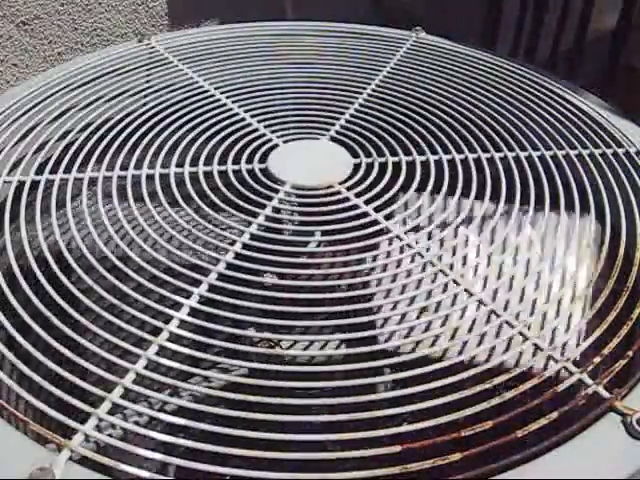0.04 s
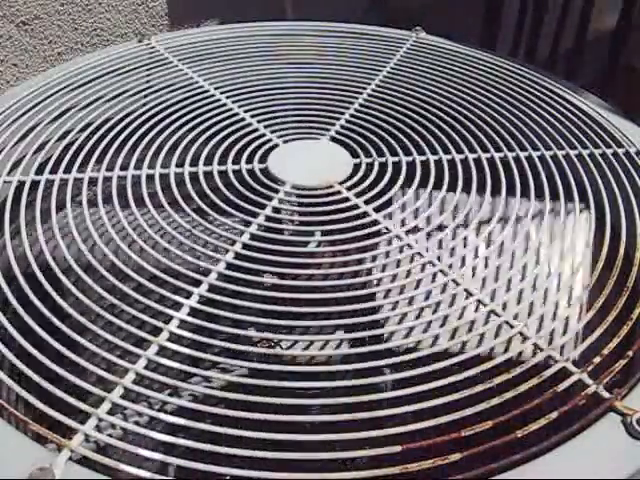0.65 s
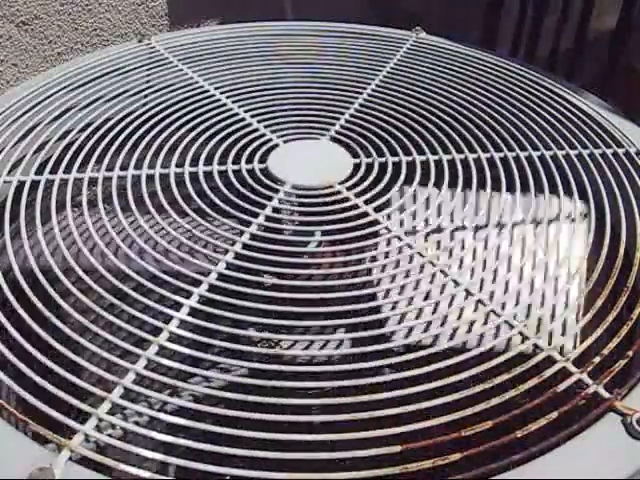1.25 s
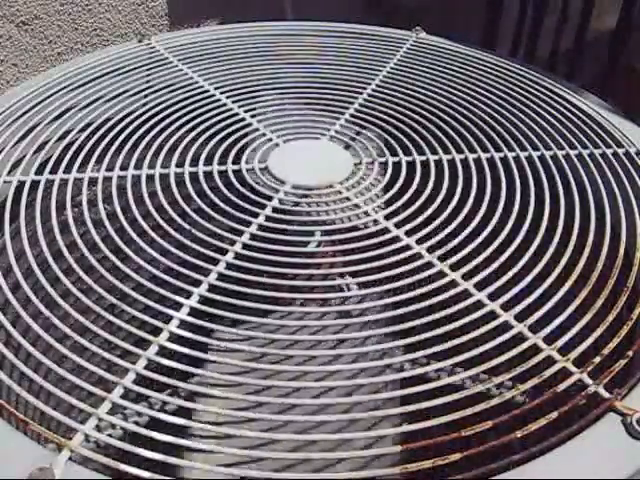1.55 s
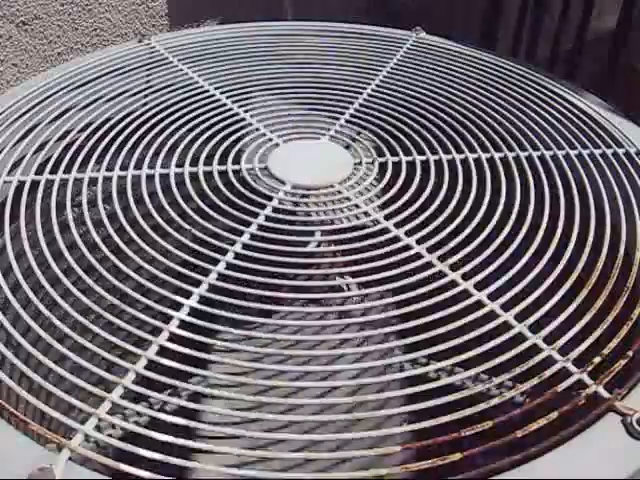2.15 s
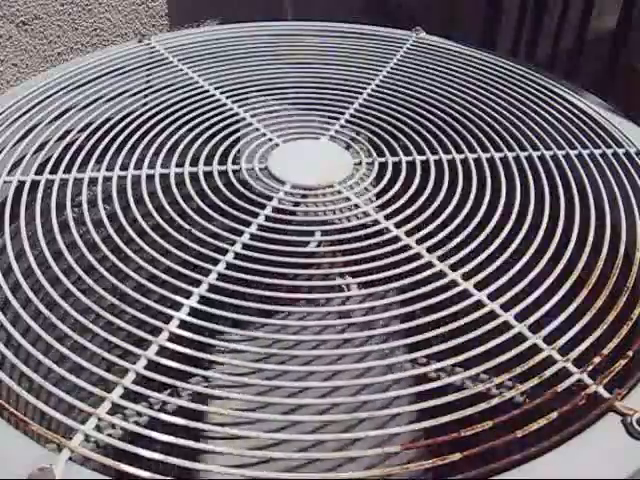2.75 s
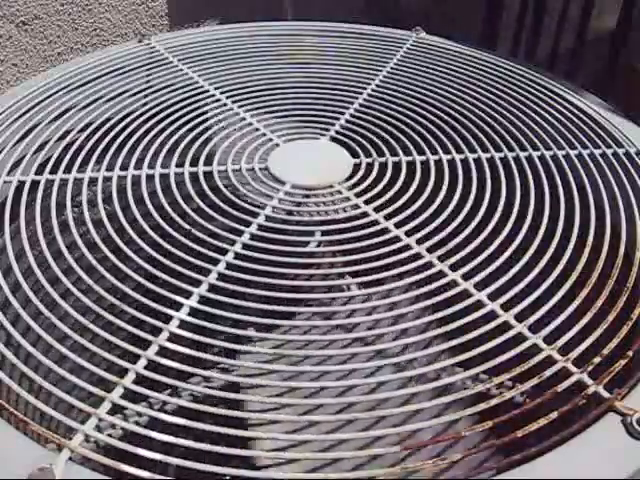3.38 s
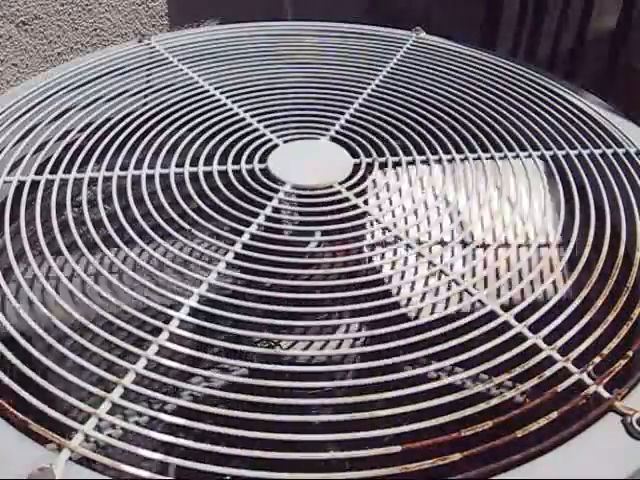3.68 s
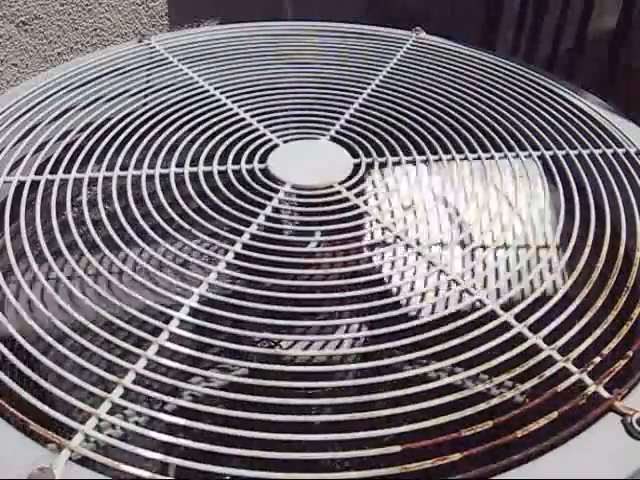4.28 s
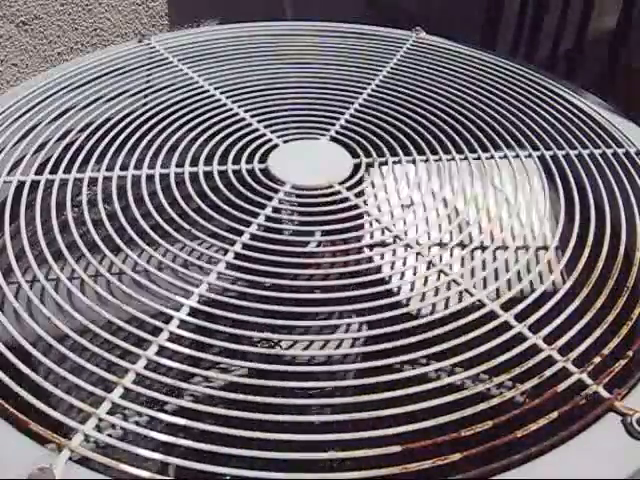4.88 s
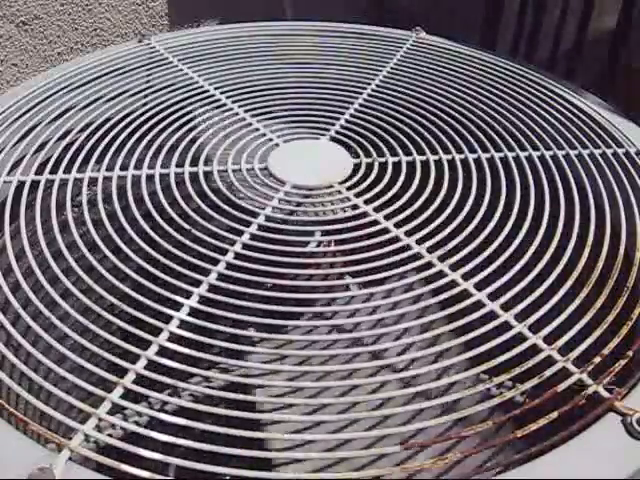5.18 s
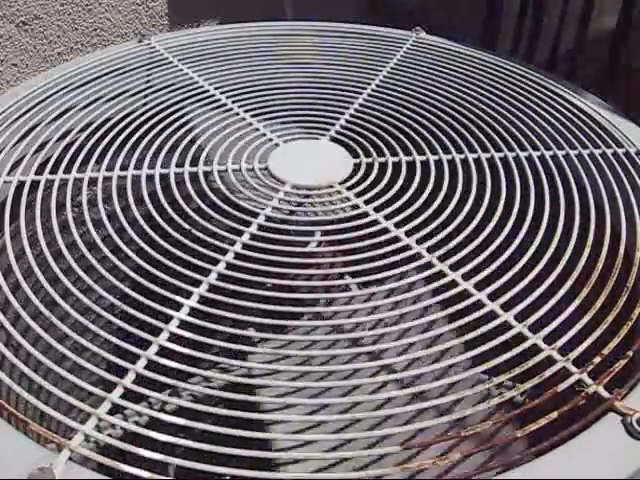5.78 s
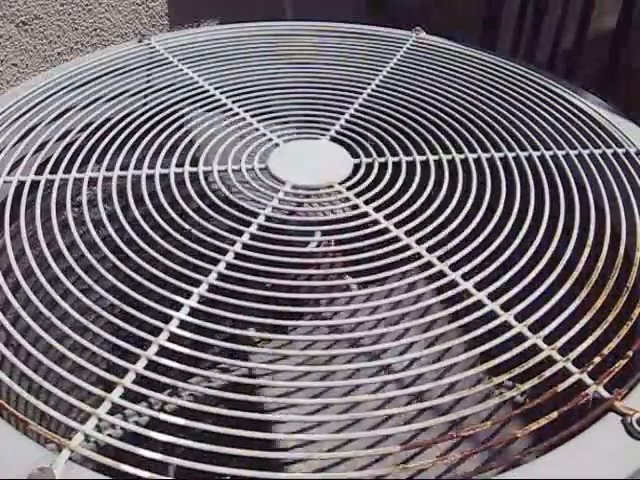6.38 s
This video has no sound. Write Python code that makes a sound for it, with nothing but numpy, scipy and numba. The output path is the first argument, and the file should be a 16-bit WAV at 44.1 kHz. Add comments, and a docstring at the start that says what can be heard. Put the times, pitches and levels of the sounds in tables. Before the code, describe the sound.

Gusty wind buffets the microphone over the deep compressor hum, motor buzz and whooshing fan of an air conditioning unit.

```python
"""An outdoor air conditioner condenser runs, heard from just above its fan grille.
The compressor hums and rings its shell, the motor buzzes, the fan blades chop a steady rush of air.
Gusts rumble and thump on the microphone, and the camera's limiter ducks the machine after each
strong one. Coarse sampling lays a gritty treble over it all."""
import sys
import numpy as np
from scipy import signal
from scipy.fft import rfft, irfft
from scipy.io import wavfile
from numba import njit

SR = 44100
rng = np.random.default_rng(int(sys.argv[2]) if len(sys.argv) > 2 else 0)


def to_wav(s):
    """Save 16-bit WAV."""
    ch = np.atleast_2d(s).T  # columns
    pcm = np.round(np.clip(ch, -1, 1) * 32767)  # PCM
    wavfile.write(sys.argv[1], SR, pcm.astype(np.int16))


N = 283563
TIME = np.arange(N) / SR


def undb(db):
    """Decibels to gain."""
    return 10 ** (np.asarray(db) / 20)


def unit(x):
    """Scale to rms 1."""
    return x / np.sqrt(np.mean(x ** 2))


def shape(spectrum, hz):
    """Gain of a (Hz, dB) spectrum at the given frequencies."""
    points, db = np.transpose(spectrum)
    return undb(np.interp(np.log(hz + 1e-9), np.log(points), db))


def noise(spectrum):
    """Noise of a given colour, rms 1."""
    hz = np.arange(N // 2 + 1) * SR / N
    return unit(irfft(rfft(rng.standard_normal(N)) * shape(spectrum, hz), N))


def walk(rate):
    """Random modulation with `rate` new values a second; spread near 1."""
    knots = rng.standard_normal(2048)
    return 1.158 * np.interp(TIME * rate, np.arange(len(knots)), knots)


def rotation(hz, wander):
    """Angle of a rotation whose speed drifts by about the fraction `wander`."""
    return 2 * np.pi * np.cumsum(hz * (1 + wander * walk(3.026))) / SR


def cycle(angle, orders, gains, size=8192):
    """One cycle of vibration, built from its partials and looped as the angle turns."""
    partials = np.zeros(size // 2 + 1, complex)
    partials[np.rint(orders).astype(int)] = gains * np.exp(2j * np.pi * rng.random(len(gains)))
    wave = irfft(partials) * size / np.sqrt(2)
    position = angle / (2 * np.pi) % 1 * size
    return np.interp(position, np.arange(size + 1), np.append(wave, wave[0]))


def tones(angle, table, waver_db, count=5):
    """Partials of a rotating part; interleaved groups swell and fade on their own in the moving air."""
    groups = [np.transpose(table[k::count]) for k in range(count)]
    return sum(cycle(angle, orders, undb(db)) * undb(waver_db * walk(9)) for orders, db in groups)


# Gusts at the microphone. Each row: start of the crest in seconds, hold in seconds, strength in dB.
GUSTS = [(0.161, .01, -18), (0.304, 0.086, -19), (0.628, 0.044, -13.5), (0.936, .21, -21.5),
         (1.35, .02, -22), (1.498, 0.014, -21), (2.662, .02, -15.5), (2.968, 0.018, -16.5),
         (3.29, .1, -9.5), (3.575, .02, -19), (3.824, .05, -15), (4.474, 0.09, -14), (4.624, 0.23, -13),
         (5.364, 0.062, -5.5), (5.59, .07, -19.5), (5.737, 0.069, -15.5), (5.87, .11, -13.5),
         (6.37, .07, -16)]

def wind_strength(rise_s=0.017, fall_s=0.044, breeze_db=-31):
    """The wind's envelope: each gust swells, holds and dies away over a faint breeze."""
    power = undb(breeze_db) ** 2
    for start, hold, db in GUSTS:
        swell = np.exp(np.minimum(TIME - start, 0) / rise_s)
        fade = np.exp(-np.maximum(TIME - start - hold, 0) / fall_s)
        power = power + (undb(db) * swell * fade) ** 2
    return np.sqrt(power)


# The colour of turbulence on the microphone. Each row: frequency in Hz, relative level in dB.
RUMBLE_SPECTRUM = [(15, -37), (30, 0), (60, 10), (150, 2), (280, -2.5), (500, -14.5), (900, -18),
                   (1600, -27.5), (4000, -45)]

def turbulence(wind, gain_db=-3.0, patchy_db=3.0, crest=2.6):
    """Patchy low rumble on the microphone that rides the gusts; its peaks are blunt."""
    rumble = noise(RUMBLE_SPECTRUM) * undb(patchy_db * walk(70))
    return crest * np.tanh(rumble / crest) * wind * undb(gain_db)


def eddies(wind, per_s=26, over_wind_db=8.5, scatter_db=3, width_s=.0013, spread_oct=1.0, count=400):
    """Lesser eddies arrive at random, scaled by the wind that carries them; rows for buffets()."""
    jitter, size, breadth = rng.uniform(-1, 1, (count, 3)).T
    times = (np.arange(count) + .5 + jitter / 2) / per_s
    db = 20 * np.log10(np.interp(times, TIME, wind)) + over_wind_db + scatter_db * size
    widths = width_s * 2 ** (spread_oct * breadth)
    return np.column_stack([times, db, widths])[times < TIME[-1]]


# The hardest eddies to hit the microphone. Each row: time in seconds, level in dB, width in seconds.
HARD_EDDIES = [(.276, 4, .00043), (.3, -2, .002), (.352, -2, 0.003), (.422, -7, 0.00065),
               (.758, -2.5, 0.00078), (.935, -0.5, 0.0021), (1.034, -2, 0.00085), (1.158, -1.5, 0.0012),
               (1.52, -3, 0.0017), (2.036, -5, 0.002), (2.665, -1, 0.0019), (3.273, 1, 0.0013),
               (3.287, 4, .001), (3.314, 6.5, 0.00065), (3.35, 8, 0.0007), (3.392, -1.5, .0005),
               (4.598, 3, 0.0007), (4.629, -1, 0.00054), (4.669, -3, .0004), (4.692, 1, 0.00043),
               (4.759, 4.5, 0.0005), (4.787, 8.5, 0.00055), (4.837, 3, 0.0011), (5.3, -2.5, .0012),
               (5.347, 1, .00092), (5.392, 3.5, 0.00062), (5.744, -2, 0.00092), (5.896, 3.5, 0.00052),
               (5.95, 3, 0.00049), (5.983, 12, 0.00058)]

def buffets(lesser_eddies, lead_s=0.0021, trail_s=0.00294, swirl=0.39, swirl_width=0.67):
    """Each eddy thumps: a pressure spike with shallow rebounds, between two smaller, sharper swirls."""
    out = np.zeros(N)
    for at, db, width in [*HARD_EDDIES, *lesser_eddies]:
        polarity, before, after = rng.uniform(-1.02, 1, 3)
        near = slice(*np.searchsorted(TIME, [at - .03, at + .03]))
        spikes = [(0, 1, width),
                  (-lead_s * (1 + before / 2), -swirl, width * swirl_width),
                  (trail_s * (1 + after / 2), -swirl, width * swirl_width)]
        for lag, size, spike_width in spikes:
            spike = 1 / (1 - 1j * (TIME[near] - at - lag) / spike_width) ** 2
            out[near] += np.sign(polarity) * size * undb(db) * spike.real
    return out


# The motor's magnetic buzz. Each row: multiple of the mains rate, level in dB.
MOTOR_PARTIALS = [(8, -59), (9, -53.5), (10, -47), (16, -43.5), (19, -74), (23, -50), (29, -47), (31, -47),
                  (33, -45), (34, -53), (35, -52), (56, -53), (58, -63), (60, -52.5), (62, -49.5),
                  (63, -54), (64, -54.5)]

def motor(mains_hz=60):
    """Steady magnetic buzz locked to the mains."""
    return tones(rotation(mains_hz, wander=0), MOTOR_PARTIALS, waver_db=-1.5)


# The colour of air rushing through coil and grille. Each row: frequency in Hz, relative level in dB.
AIR_SPECTRUM = [(20, 2), (35, 0.5), (80, -2), (180, -10), (400, -5.5), (800, -6), (1200, -9), (1900, -8.5),
                (2500, -11.5), (3400, -11), (4000, -15), (4600, -16.5), (5500, -16.5), (6000, -62)]
# The drone of the blades. Each row: multiple of the blade rate, level in dB.
BLADE_PARTIALS = [(1, -36), (3, -57), (6, -46.5), (8, -47.5), (9, -45), (11, -49), (12, -56), (13, -45.5),
                  (14, -41.5), (15, -44), (17, -52.5), (18, -49), (19, -65), (20, -68), (21, -61),
                  (22, -48.5)]

def fan(air_db, blade_hz=28.35, blades=3, chop=0.12, wobble=0.046, flutter_db=-0.5):
    """The rush of air pulses with each passing blade and once a turn, over low blade tones."""
    angle = rotation(blade_hz, wander=0.00152)
    pulsing = 1 + chop * np.sin(angle) + wobble * np.sin(angle / blades)
    rush = noise(AIR_SPECTRUM) * pulsing * undb(air_db + flutter_db * walk(11))
    return rush + tones(angle, BLADE_PARTIALS, waver_db=3.0)


# The compressor's hum, then its shell's ring. Each row: multiple of the shaft rate, level in dB.
COMPRESSOR_PARTIALS = [(2, -21.5), (15, -35), (17, -48.5), (19, -49), (20, -47), (23, -49), (24, -48.5),
                       (25, -41.5), (26, -40.5), (27, -53.5), (30, -46.5), (31, -38.5), (32, -46.5),
                       (33, -64), (34, -51.5), (35, -56.5), (37, -57), (38, -63), (39, -46.5), (41, -48.5),
                       (42, -54), (43, -51), (44, -52.5), (49, -47.5), (50, -49), (52, -51), (53, -51),
                       (55, -55), (56, -63), (60, -67)]

def compressor(swell_db, shaft_hz=58.645, hum_trim_db=-.5, rattle_db=-38, scatter_db=3):
    """A deep hum at twice the shaft rate, a ringing shell, and a fine rattle that repeats every turn."""
    angle = rotation(shaft_hz, wander=0.00022)
    (hum_order, hum_db), *shell = COMPRESSOR_PARTIALS
    hum_gain = undb(hum_db + hum_trim_db + swell_db + .5 * walk(6.9))
    hum = np.sqrt(2) * hum_gain * np.sin(round(hum_order) * angle)
    # The rattle fills the harmonics that the shell leaves free.
    orders = np.setdiff1d(np.arange(18, 90), np.rint(np.transpose(shell)[0]))
    scatter = undb(scatter_db * rng.standard_normal(len(orders)))
    gains = shape(AIR_SPECTRUM, orders * shaft_hz) * np.sqrt(orders) * scatter
    rattle = undb(rattle_db) * unit(cycle(angle, orders, gains))
    ring = undb(swell_db) * tones(angle, shell, waver_db=1.56)
    return hum + ring + rattle


# The machine's slow drift. Each row: time in seconds, air rush level in dB, hum and ring gain in dB.
LEVEL_DRIFT = [(0, -26.5, 0), (.8, -27, -2.5), (1.5, -25, 0.5), (2.3, -22.5, 1.5), (3.2, -24.5, 2.5),
               (4.2, -25.5, 2), (5.2, -25, 3), (5.8, -29, -1.5), (6.43, -27.5, 0.5)]

def condenser():
    """Compressor, motor and fan run together while hum, ring and rush slowly swell and ease."""
    times, *levels = np.transpose(LEVEL_DRIFT)
    air_db, swell_db = [np.interp(TIME, times, db) for db in levels]
    return compressor(swell_db) + motor() + fan(air_db)


def scene():
    """The machine and the wind at one microphone."""
    wind = wind_strength()
    return (condenser() + turbulence(wind) + buffets(eddies(wind)))[None]


@njit
def follow_peaks(x, attack, release, level):
    """Envelope that jumps up with each peak and sinks slowly."""
    out = np.empty(len(x))
    for i in range(len(x)):
        level += (abs(x[i]) - level) * attack if abs(x[i]) > level else -level * release
        out[i] = level
    return out


def limiter(x, ceiling_db=-9.0, attack_s=0.00063, release_s=0.2, start_db=-2):
    """Ducks everything at a peak and recovers slowly; it opens already ducked, as after a gust."""
    attack = 1 - np.exp(-1 / (attack_s * SR))
    envelope = follow_peaks(x, attack, 1 / (release_s * SR), float(undb(start_db)))
    return x * np.minimum(1, undb(ceiling_db) / envelope)


def record(dry, clip_level=0.39, low_cut_hz=20, high_cut_hz=15650, hold_samples=4):
    """The camera limits and rounds the peaks, then samples coarsely."""
    limited = clip_level * np.tanh(limiter(dry[0]) / clip_level)
    coupled = signal.sosfilt(signal.butter(2, low_cut_hz, "high", fs=SR, output="sos"), limited)
    # Holding each value mirrors the sound into a gritty treble.
    held = np.repeat(coupled[::hold_samples], hold_samples)[:N]
    return signal.sosfilt(signal.ellip(12, .2, 90, high_cut_hz, fs=SR, output="sos"), held)[None]


dry = scene()
out = record(dry)
to_wav(out)
```